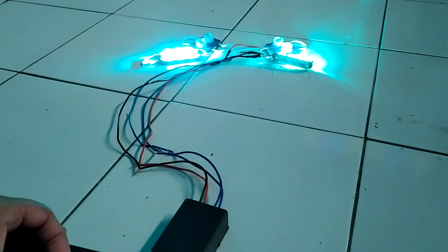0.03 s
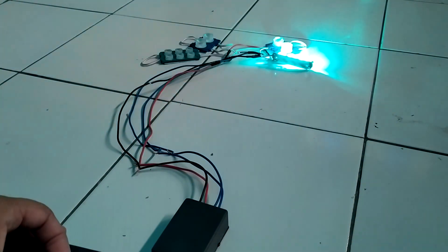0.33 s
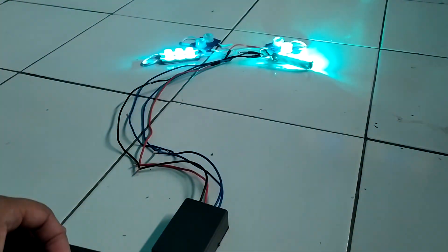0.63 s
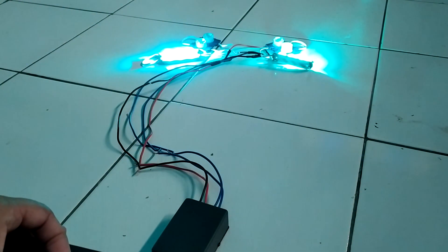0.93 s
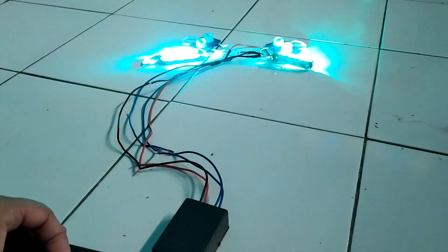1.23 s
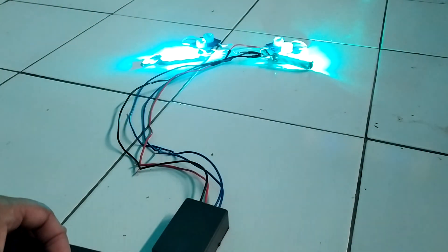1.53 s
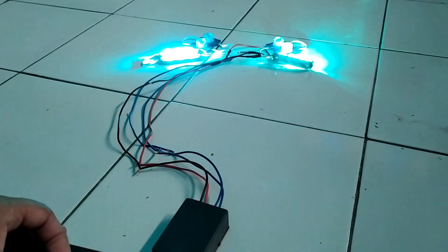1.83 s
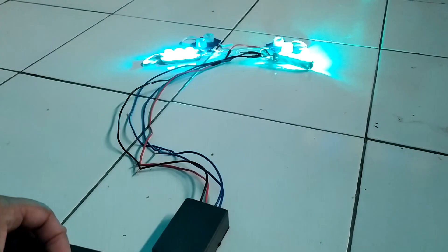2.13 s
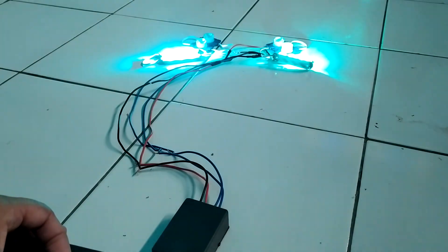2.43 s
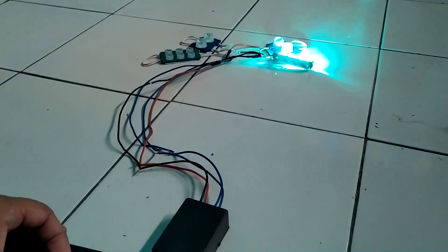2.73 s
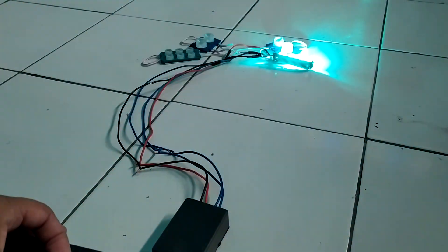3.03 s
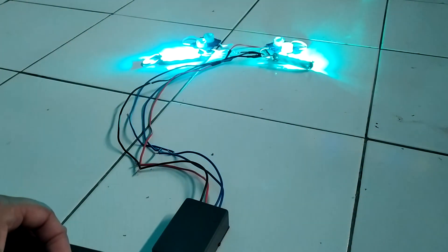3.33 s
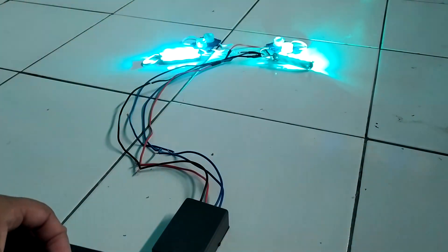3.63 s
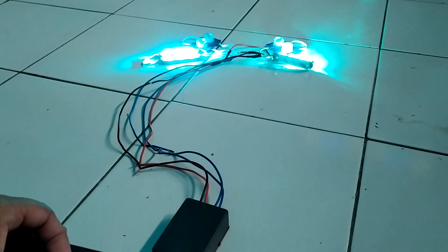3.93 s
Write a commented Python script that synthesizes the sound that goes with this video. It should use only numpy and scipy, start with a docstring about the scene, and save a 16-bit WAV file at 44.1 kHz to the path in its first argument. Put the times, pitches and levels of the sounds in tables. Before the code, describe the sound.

Quick trains of bright clicks from a lamp flasher relay repeat five times with short gaps, echoing in a hard-floored room. Behind them, in stereo, are light hiss and a distant motorbike throbbing, then speeding up.

```python
"""A hard room with a tiled floor, on a stereo pair. From the start a soft hiss lies over it all, and
behind the walls an engine, probably a motorbike, throbs. A quarter second in, a flasher relay starts
strobing lamps in evenly spaced bursts: its armature drops and pulls in seven times, the contacts bounce
and ring the small case, and the room answers. A brief rasp lies under the first burst. Later the engine
picks up speed, a faint narrow hiss swells and fades, and the fifth burst is cut short."""
import sys
import numpy as np
from scipy import signal
from scipy.fft import rfft, irfft
from scipy.io import wavfile
from scipy.ndimage import uniform_filter1d

SR = 44100
rng = np.random.default_rng(int(sys.argv[2]) if len(sys.argv) > 2 else 0)


def wrap_up_sound(samples):
    """Save the sound to the file named by the first command line argument, as 16-bit audio."""
    columns = np.atleast_2d(samples).T
    # keep every value between -1 and 1, then stretch to whole-number steps
    tamed = np.clip(columns, -1, 1)
    steps = np.round(tamed * 32767).astype(np.int16)
    wavfile.write(sys.argv[1], SR, steps)


N = 176400
TIME = np.arange(N) / SR
LEFT_LAG_S = .000115   # the left microphone hears the relay and the engine this much later

# Modes of the relay and its case. Each row: frequency in Hz, relative energy on pull-in in dB,
# the same on drop, left minus right in dB.
CASE_MODES = [(597, -37, -43, 2), (907, -36.5, -67, 11), (1150, -36.5, -57, -1), (2173, -30.5, -50, -7),
              (3280, -45.5, -49.5, -1), (3785, -41.5, -46, 16), (4470, -38, -44, -6), (4864, -27.5, -32, 0),
              (5040, -35.5, -36, 1), (6543, -23.5, -30.5, -12.5), (7156, -28.5, -42, 2.5),
              (7300, -38.5, -34, -9.5), (8226, -27.5, -23.5, -1), (8580, -23.5, -33.5, -7),
              (9800, -32, -35.5, -1), (10270, -23.5, -33, 6), (10630, -32.5, -41, -4), (11450, -32, -44, 9),
              (12360, -32, -37, 7), (13000, -40.5, -35, -7), (13300, -34, -48, -2), (14600, -43, -35, 2),
              (14400, -33, -37, -4), (15060, -29, -35, 18), (16000, -25, -50, -2)]


def from_db(db):
    """Decibels to gain."""
    return 10 ** (np.asarray(db) / 20)


def rms_one(x):
    """Scale to rms 1."""
    return x / np.sqrt(np.mean(x ** 2) + 1e-20)


def energy_one(x):
    """Scale each row to energy 1."""
    return x / np.sqrt(np.sum(x ** 2, axis=-1, keepdims=True) + 1e-20)


def in_time(rows):
    """Each column of a timed curve, at every sample."""
    seconds, *columns = np.transpose(rows)
    return [np.interp(TIME, seconds, column) for column in columns]


def at_hz(points, hz):
    """Read a curve on a log-frequency axis."""
    point_hz, value = np.transpose(points)
    return np.interp(np.log(np.maximum(hz, 1)), np.log(point_hz), value)


def coloured(x, spectrum):
    """Filter by a curve of Hz and dB."""
    size = x.shape[-1]
    return irfft(rfft(x) * from_db(at_hz(spectrum, np.fft.rfftfreq(size, 1 / SR))), size)


def drift(per_s):
    """A line wandering through up to 400 random values, per_s of them a second."""
    return np.interp(TIME * per_s, np.arange(400), rng.standard_normal(400))


def stereo_noise(spectrum, alike):
    """Coloured noise of rms 1; alike is the correlation between the microphones."""
    mid, side = coloured(rng.standard_normal((2, N)), spectrum)
    return rms_one(np.sqrt(1 + alike) * mid + np.sqrt(1 - alike) * np.array([side, -side]))


def panned(pan_db):
    """Left and right gains, pan_db apart, at constant total power."""
    gains = from_db(np.array([pan_db, -pan_db]) / 2)
    return gains / np.sqrt(np.mean(gains ** 2, axis=0))


def room_air(level_db):
    """Steady air in the room, mostly low."""
    # Each row: frequency in Hz, relative level in dB.
    colour = [(20, -17), (200, 3.5), (400, -3), (700, -3.5), (1100, -7), (1600, -18), (2400, -13),
              (4000, -17), (8000, -27), (16000, -69)]
    return from_db(level_db) * stereo_noise(colour, alike=0.32)


def high_hiss():
    """A soft, wide hiss that swells now and then."""
    # Each row: frequency in Hz, relative level in dB.
    colour = [(1000, -3), (2500, -5.5), (4000, 0.5), (5500, -3.5), (7000, 1), (10000, -1), (12000, -7),
              (15500, -15)]
    # Each row: time in seconds, level in dB.
    swells = [(0, -56.5), (.12, -61.5), (.265, -62.5), (.6, -62), (.98, -65), (1.04, -55.5), (1.3, -61),
              (1.85, -61.5), (2.65, -61), (2.72, -59.5), (3.3, -59), (3.6, -60), (4, -54.5)]
    level_db, = in_time(swells)
    return from_db(level_db) * stereo_noise(colour, alike=0.015)


def engine(roughness=0.44, rumble_db=-9.5, trim_db=-1):
    """Exhaust behind the walls: muffled, wavering multiples of the firing rate over a rumble."""
    # Each row: time in seconds, firings per second.
    speed = [(0, 16.9), (.4, 16.7), (.75, 15.6), (1.1, 15.4), (1.4, 16.4), (1.65, 18.3), (1.9, 19.8),
             (2.15, 19.9), (2.45, 17.6), (2.68, 17.3), (2.85, 20.6), (3.15, 21.9), (3.4, 24.1),
             (3.72, 24.4), (3.87, 25.4), (4, 25.4)]
    # Character of the exhaust. Each row: multiple of the firing rate, relative level in dB.
    orders = [(2, 9), (3, -10.5), (4, 7), (5, 4), (6, -3), (7, 0), (8, 0.5), (10, -2), (11, 4.5), (12, 3.5),
              (14, -2), (18, -3), (23, -3)]
    # The exhaust's colour through the walls. Each row: frequency in Hz, gain in dB.
    through_wall = [(30, -46), (52, 4.5), (68, 0.5), (80, -1.5), (95, -21), (108, 3.5), (122, 2.5),
                    (132, -0.5), (146, -9), (158, -8.5), (172, -21), (195, -22), (214, -10.5), (228, -14.5),
                    (262, -8.5), (277, -20), (291, -11), (320, -15.5), (335, -21.5), (362, -15.5),
                    (385, -27.5), (410, -28.5), (600, -36.5)]
    # Bass, boom and low middle. Each row: lower and upper edge in Hz.
    bands = [(42, 103.5), (92, 191.6), (185, 960)]
    # Each row: time in seconds, then relative level of bass, boom and low middle in dB.
    swells = [(0.0, -45, -53, -60), (0.05, -42.5, -45.5, -61), (0.47, -44.5, -50, -60.5),
              (0.59, -59, -50, -65.5), (0.65, -47.5, -53.5, -67.5), (0.86, -47.5, -50, -63),
              (0.92, -57, -58, -64.5), (1.03, -50, -49, -61), (1.18, -54.5, -51.5, -63.5),
              (1.25, -49, -47, -62.5), (1.4, -46, -49.5, -61), (1.5, -54, -48, -61.5),
              (1.66, -49, -46, -56.5), (2.25, -46, -50.5, -52.5), (2.71, -44, -49.5, -54.5),
              (2.88, -50.5, -41, -51.5), (2.98, -55.5, -42.5, -50.5), (3.16, -51, -35.5, -47.5),
              (3.31, -53, -40.5, -45.5), (3.46, -61, -35, -45.5), (3.68, -61, -35, -46),
              (3.75, -50, -37.5, -46.5), (3.82, -52, -35.5, -41.5), (4.0, -46.5, -36.5, -44.5)]
    firing_hz, = in_time(speed)
    phase = 2 * np.pi * (np.cumsum(firing_hz) / SR - np.outer([1, 0], LEFT_LAG_S * firing_hz))
    tone = 0
    for order in range(2, 24):
        order_db = at_hz(through_wall, order * firing_hz) + np.interp(order, *np.transpose(orders))
        waver = 1 + roughness * drift(per_s=7)
        tone += from_db(order_db) * waver * np.sin(order * phase + rng.uniform(0, 2 * np.pi))
    exhaust = rms_one(tone) + from_db(rumble_db) * stereo_noise(through_wall, alike=0.83)
    out = 0
    for edges_hz, swell_db in zip(bands, in_time(swells)):   # level each band, then let it swell
        bandpass = signal.butter(4, edges_hz, "band", fs=SR, output="sos")
        band = signal.sosfiltfilt(bandpass, exhaust, padtype="even", padlen=SR // 2)
        running_rms = np.sqrt(uniform_filter1d(np.mean(band ** 2, axis=0), size=6000) + 1e-12)
        out += band / running_rms * from_db(swell_db + trim_db)
    return out * from_db([[.3], [-.3]])   # a touch to the left


def click(bounces, mode_db, rings, grit, crack_db=-5.5, crack_t60_s=0.01):
    """One throw of the armature: nearly the same few bounces each time crack and strike every mode."""
    # Each row: frequency in Hz, relative level in dB.
    crack_colour = [(300, 2), (1000, -20), (1600, -31), (2700, -32), (3700, -6.5), (4700, -3), (5500, -11),
                    (6200, 1), (7400, 9.5), (10000, 2), (12000, -3), (15000, -1), (16500, 0.5)]
    jitter_ms, bounce_spread_db, mode_spread_db, fresh_grit_db = 0.016, 3, 2.03, -6   # click to click
    size = rings.shape[-1]
    hz = np.fft.rfftfreq(size, 1 / SR)
    bounce_ms, bounce_db = np.transpose(bounces)
    timing, force = rng.standard_normal((len(bounces), 2)).T
    delay_s = np.abs(bounce_ms + jitter_ms * timing) / 1000
    strengths = from_db(bounce_db + bounce_spread_db * force)
    blows = strengths @ np.exp(-2j * np.pi * np.outer(delay_s, hz))   # spectrum of the bounce train
    mode_gains = from_db(mode_db + mode_spread_db * rng.standard_normal(len(mode_db)))
    mic_gains = mode_gains * panned(np.array(CASE_MODES)[:, -1])
    struck_modes = energy_one(irfft(rfft(rings) * blows, size))
    ring = np.sum(mic_gains[:, :, None] * struck_modes, axis=1)
    grit = grit + from_db(fresh_grit_db) * rng.standard_normal(grit.shape)
    crack = coloured(grit, crack_colour) * 1000 ** (-TIME[:size] / crack_t60_s)
    cracks = energy_one(irfft(rfft(crack) * blows, size))
    return ring + from_db(crack_db) * np.linalg.norm(from_db(mode_db)) * cracks


def relay(burst_count, flash_count):
    """Each flash is a light drop and a firmer pull-in; the modes reach the microphones out of phase."""
    # Contact bounces on drop and on pull-in. Each row: delay in ms, relative level in dB.
    drop_bounces = [(0.051, -0.5), (0.898, 1.5), (1.699, -5), (2.798, -1.5)]
    pull_bounces = [(0.051, 0), (0.5, 6), (1.199, -1), (2.302, 0.5), (3.4, -4.5)]
    # Each row: mode frequency in Hz, seconds to ring down by 60 dB.
    ring_t60 = [(1000, 0.015), (2200, 0.019), (5000, 0.012), (8000, 0.01), (15000, 0.018)]
    # Each row: mode frequency in Hz, extra phase between the microphones in radians.
    phase_gaps = [(600, 0.21), (1100, 0.38), (2500, 1.03), (8000, 1.185)]
    first_burst_s, burst_every_s, flash_every_s, stop_s = .2555, .8484, .07733, 3.86
    drop_lead_s, pull_after_s, drop_trim_db = .00025, .0361, 1
    hz, pull_db, drop_db, _ = np.transpose(CASE_MODES)
    t = TIME[:2048]
    gap = at_hz(phase_gaps, hz) * (-1) ** np.arange(len(hz))
    phase = rng.uniform(0, 2 * np.pi, len(hz)) + np.array([gap, -gap]) / 2
    decay = 1000 ** (-t / at_hz(ring_t60, hz)[:, None])
    rings = np.sin(2 * np.pi * hz[:, None] * t + phase[:, :, None]) * decay
    drop_grit, pull_grit = rng.standard_normal((2, 2, len(t)))
    throws = [(-drop_lead_s, drop_bounces, drop_db + drop_trim_db, drop_grit),
              (pull_after_s, pull_bounces, pull_db, pull_grit)]
    bursts_s = first_burst_s + np.arange(burst_count) * burst_every_s
    flashes_s = np.add.outer(bursts_s, np.arange(flash_count) * flash_every_s)
    out = np.zeros((2, N + SR))
    for flash_s in flashes_s[flashes_s < stop_s]:
        for offset_s, bounces, mode_db, grit in throws:
            start = int((flash_s + offset_s) * SR)
            out[:, start:start + len(t)] += click(bounces, mode_db, rings, grit)
    return out[:, :N]


def room(x, echo_db=-8, tail_db=-3.5):
    """A scattered echo off the nearest wall, then the hard room's bright tail."""
    # Colour of the reflections. Each row: frequency in Hz, gain in dB.
    colour = [(500, -1), (950, -2.5), (1120, 5.5), (1400, -1), (2200, -3.5), (3300, 5), (4800, -3.5),
              (6400, -0.5), (7400, 4.5), (8150, 2.5), (8800, -1), (10700, -6), (12300, -0.5), (15000, -4),
              (15600, -11)]
    echo_s, echo_width_s = 0.0072, 0.0029
    tail_delay_s, low_t60_s, treble_t60_s = 0.0049, 0.88, 1
    t = TIME[:SR]
    early, late = rng.standard_normal((2, 2, SR))
    echo = energy_one(early * np.exp(-.5 * ((t - echo_s) / echo_width_s) ** 2))
    low = signal.sosfiltfilt(signal.butter(2, 9000, fs=SR, output="sos"), late)
    tail = low * 1000 ** (-t / low_t60_s) + (late - low) * 1000 ** (-t / treble_t60_s)
    response = from_db(echo_db) * echo + from_db(tail_db) * energy_one(tail * (t > tail_delay_s))
    mono = x.sum(axis=0, keepdims=True) / np.sqrt(2)
    return signal.fftconvolve(mono, coloured(response, colour), axes=1)[:, :N]


def lean_left(x):
    """The left microphone gets more of the treble, a little later."""
    # Each row: frequency in Hz, left minus right in dB.
    balance = [(1000, -1.5), (6000, 3), (9000, 5), (13000, 3.5), (16000, 7)]
    hz = np.fft.rfftfreq(N, 1 / SR)
    lag = np.exp(-2j * np.pi * np.outer([LEFT_LAG_S, 0], hz))
    return irfft(rfft(x) * lag * panned(at_hz(balance, hz)), N)


def rasp(flutter_db=1.5):
    """A brief scratchy hiss under the first burst: fluttering noise in a row of resonances."""
    # Each row: centre in Hz, width in Hz, relative gain in dB.
    resonances = [(1130, 180, -4), (2090, 230, 1.5), (2880, 590, -4), (4020, 390, 2), (4900, 600, 2),
                  (5950, 150, 6), (6960, 1300, 2.5), (8400, 1000, -3), (9800, 2300, -3), (11900, 1700, -8),
                  (14800, 1800, -8)]
    # Each row: time in seconds, level in dB.
    swell = [(.27, -85), (.295, -48), (.44, -50.5), (.6, -59), (.8, -81)]
    noise = rng.standard_normal((2, N)) * from_db(-flutter_db * drift(per_s=110))
    scratch = sum(from_db(db) * signal.lfilter(*signal.iirpeak(hz, hz / width, fs=SR), noise)
                  for hz, width, db in resonances)
    level_db, = in_time(swell)
    return from_db(level_db) * rms_one(scratch)


def narrow_hiss():
    """A faint band of hiss that comes up around three seconds in."""
    # Each row: frequency in Hz, relative level in dB.
    colour = [(1700, -23), (2150, -7), (2400, -7), (2700, -13), (3300, -32)]
    # Each row: time in seconds, level in dB.
    swell = [(2.3, -75), (2.55, -72.5), (2.95, -66), (3.3, -71.5), (3.6, -71)]
    level_db, = in_time(swell)
    return from_db(level_db) * stereo_noise(colour, alike=0.2)


def scene():
    """At the microphones: the relay in its room, the engine outside, air and hiss all round."""
    clicks = relay(burst_count=5, flash_count=7)
    clicks_in_room = lean_left(clicks + room(clicks))
    return clicks_in_room + engine() + room_air(level_db=-63) + high_hiss() + narrow_hiss() + rasp()


def record(dry):
    """The top is cut steeply."""
    cutoff_hz = 15750
    return signal.sosfilt(signal.ellip(10, .2, 80, cutoff_hz, fs=SR, output="sos"), dry)


dry = scene()
out = record(dry)
wrap_up_sound(out)
```